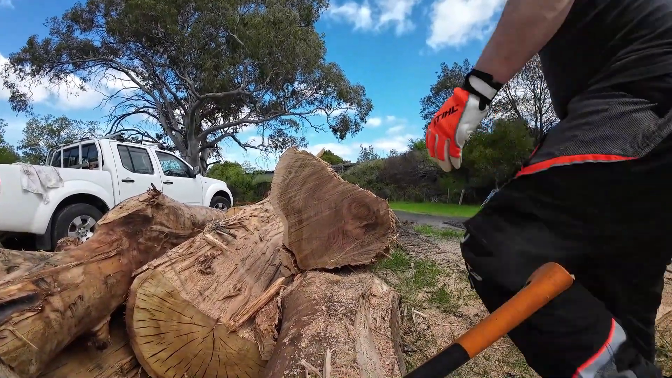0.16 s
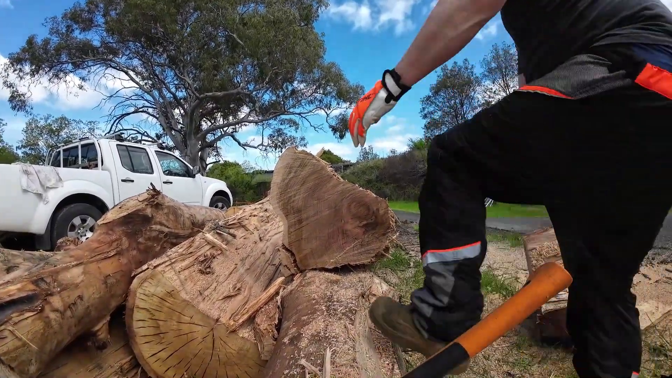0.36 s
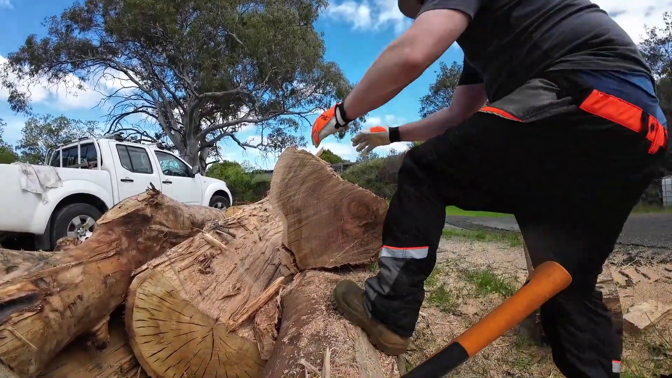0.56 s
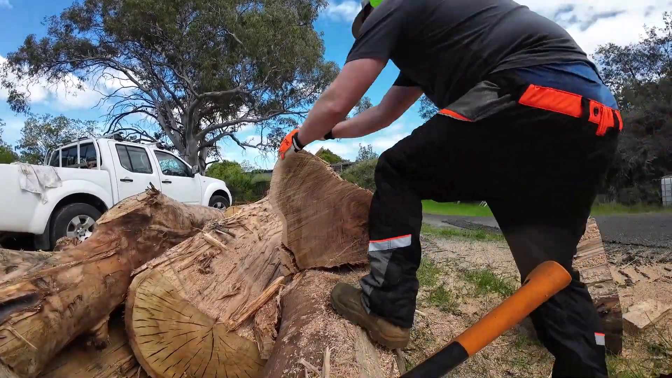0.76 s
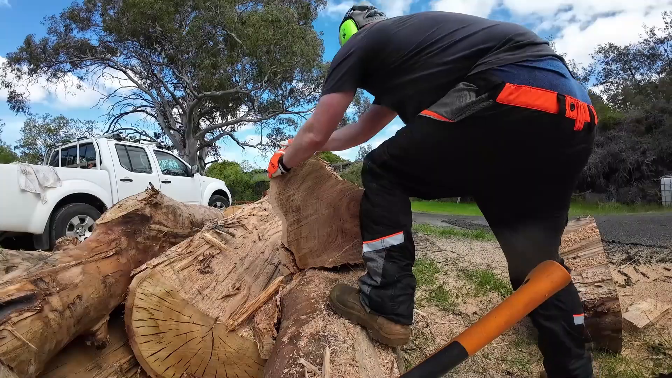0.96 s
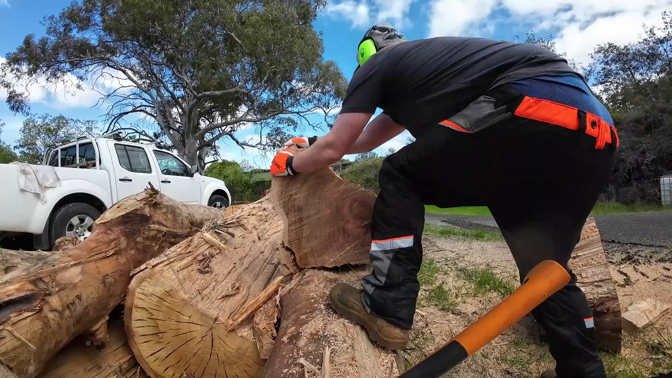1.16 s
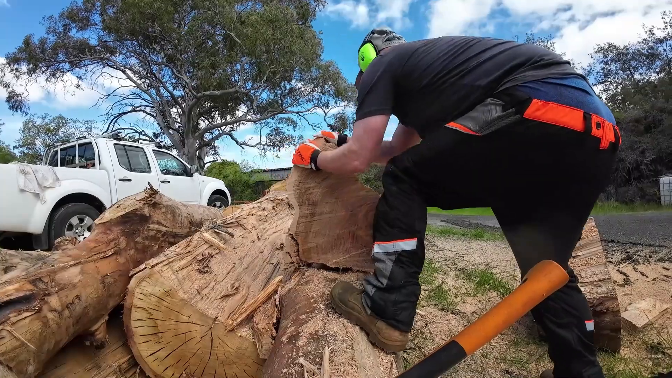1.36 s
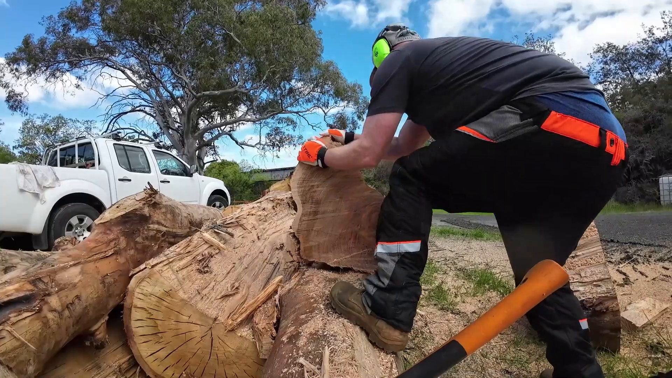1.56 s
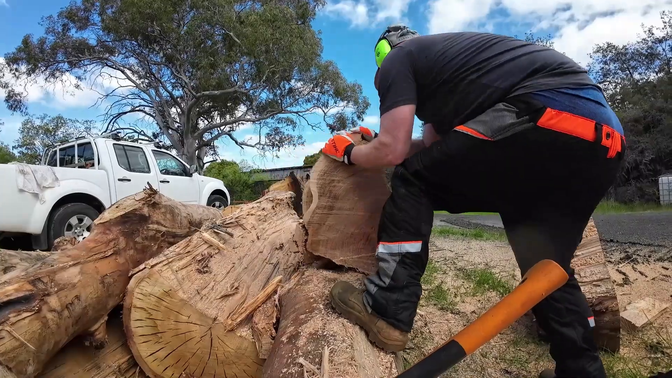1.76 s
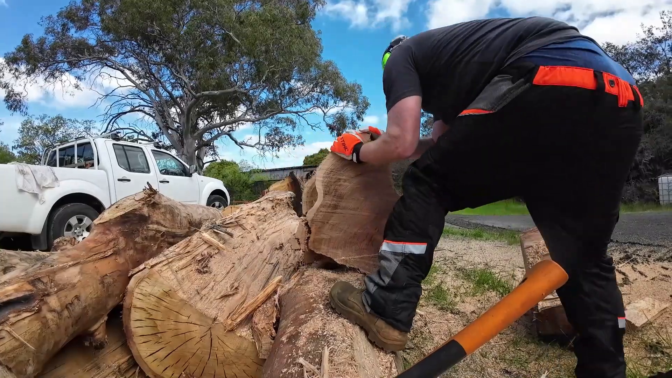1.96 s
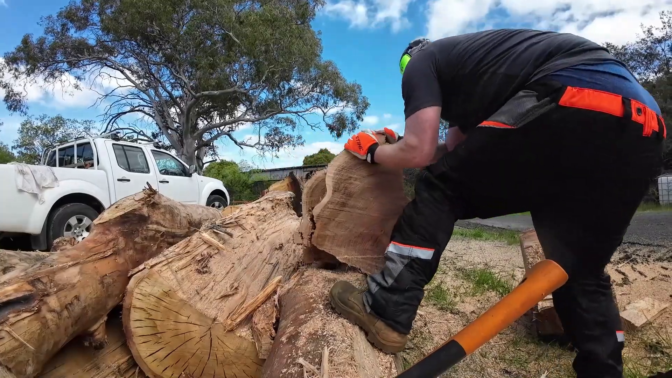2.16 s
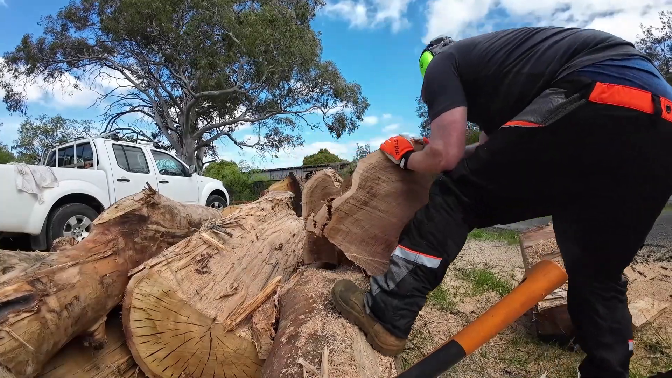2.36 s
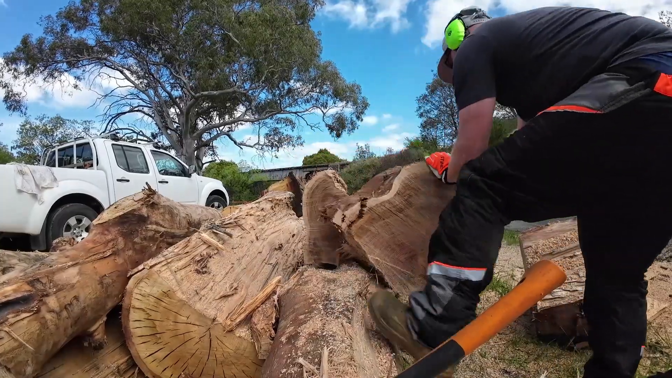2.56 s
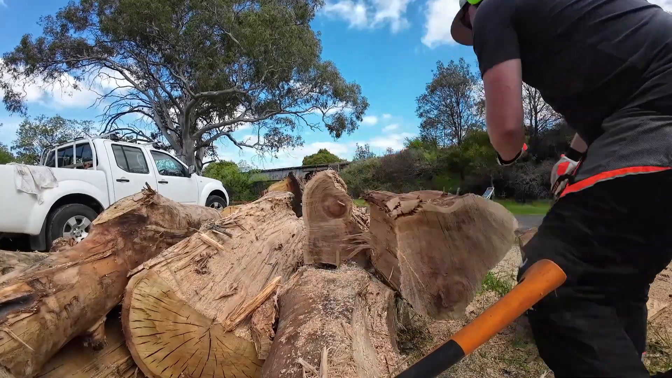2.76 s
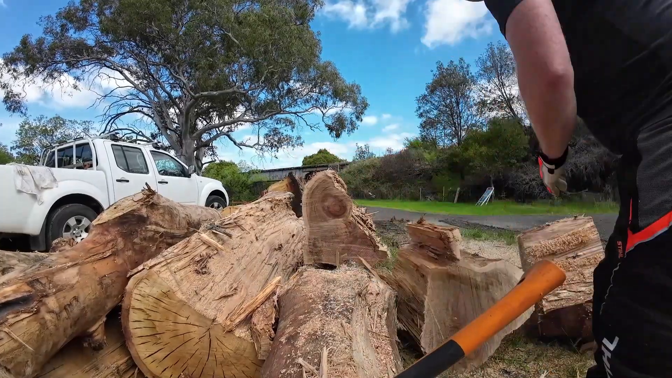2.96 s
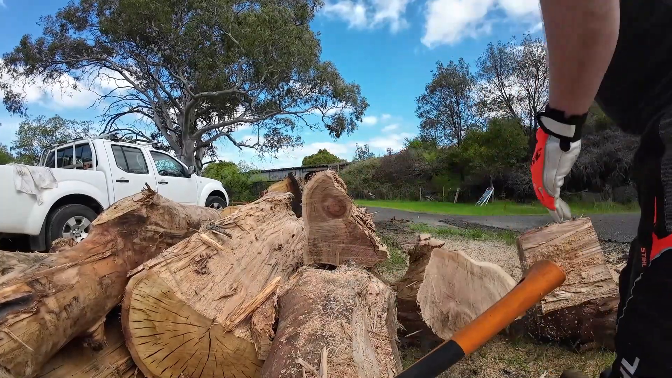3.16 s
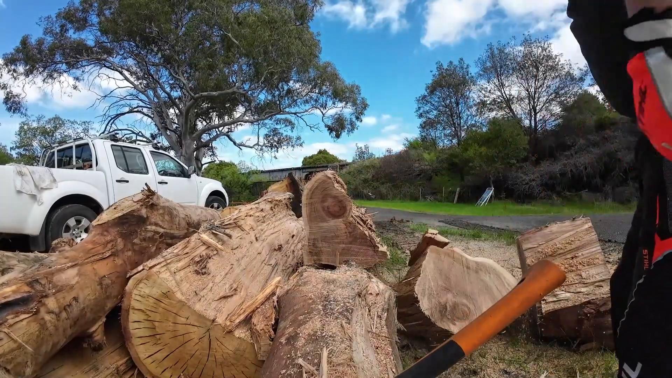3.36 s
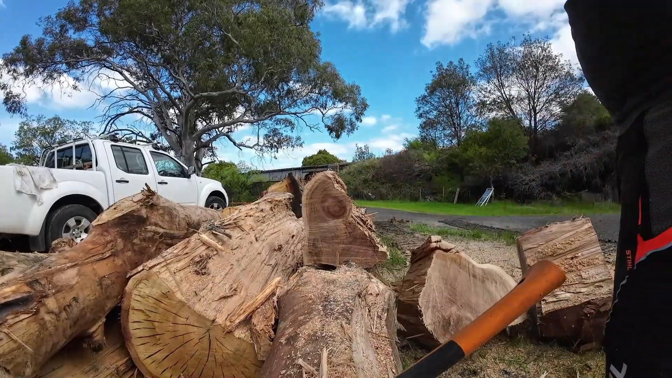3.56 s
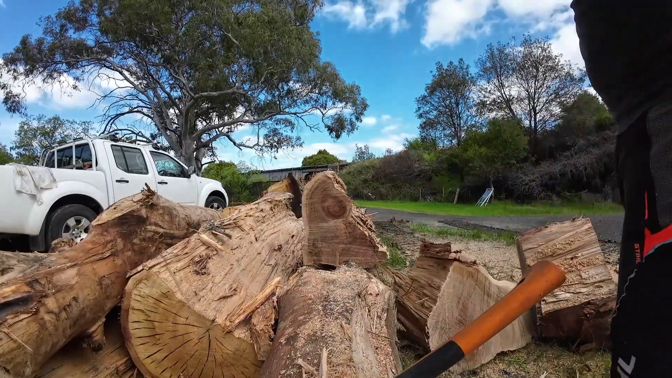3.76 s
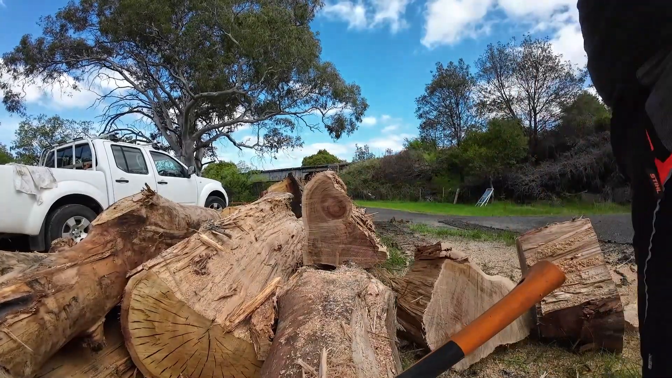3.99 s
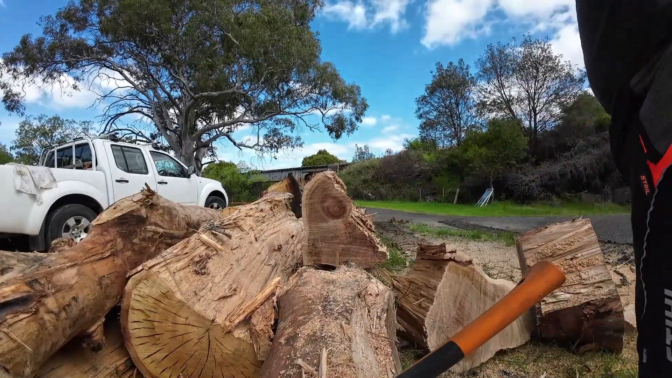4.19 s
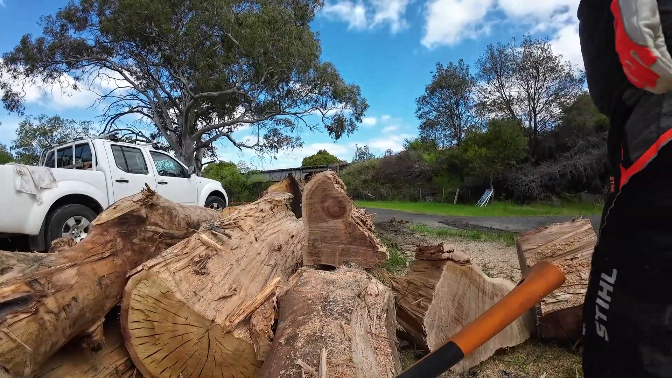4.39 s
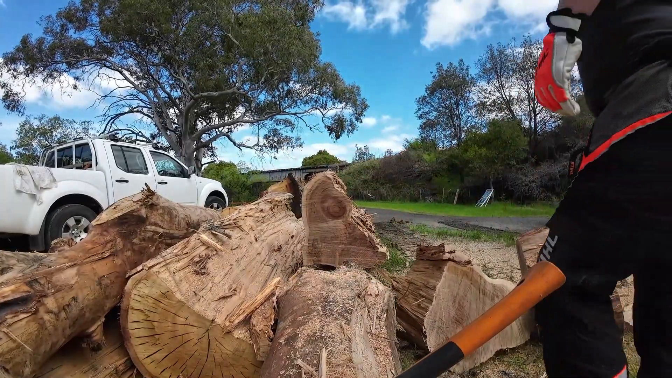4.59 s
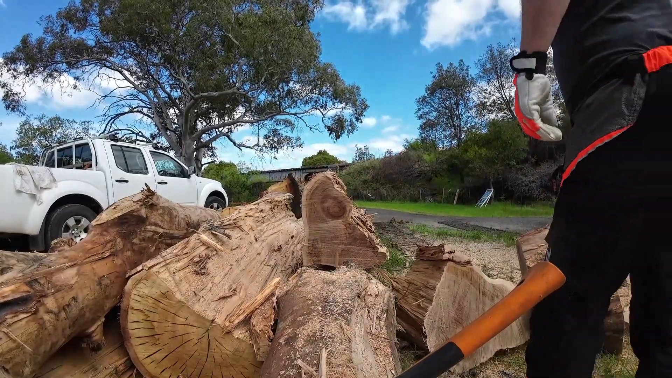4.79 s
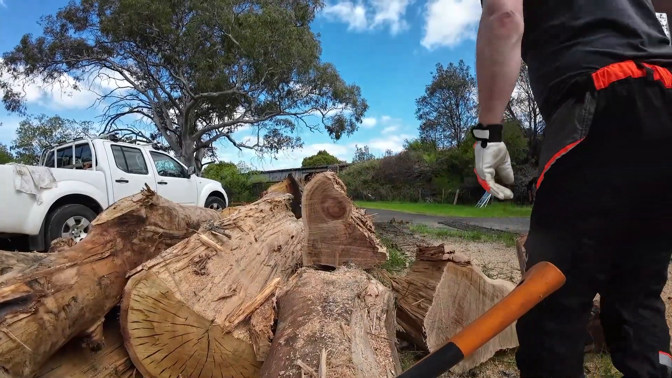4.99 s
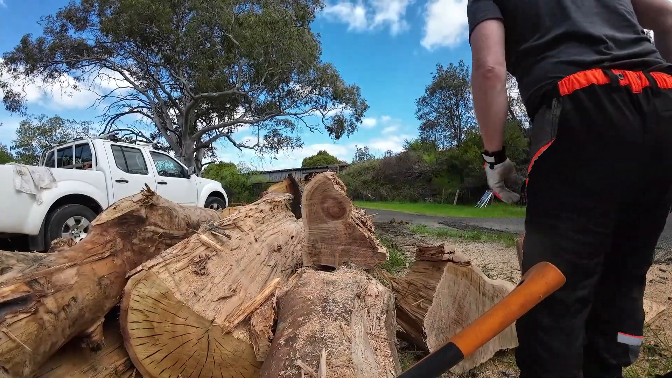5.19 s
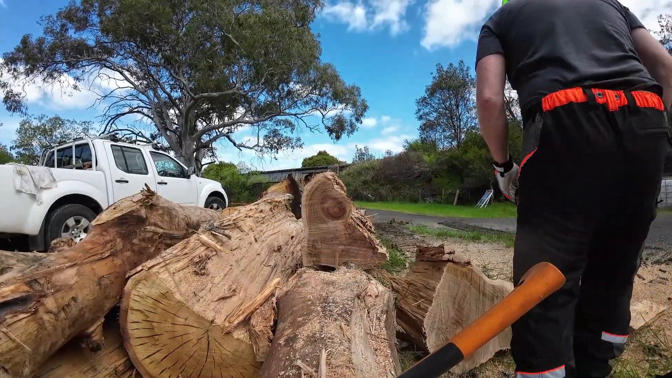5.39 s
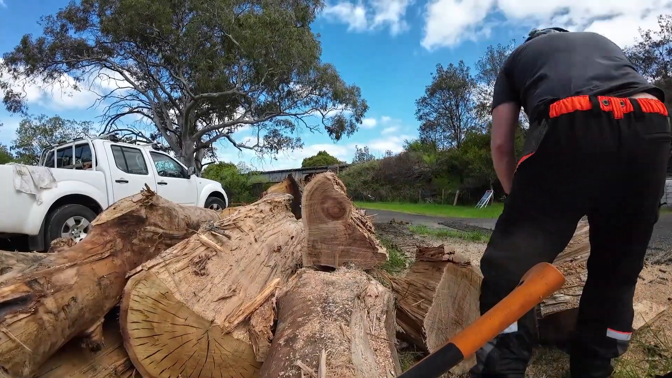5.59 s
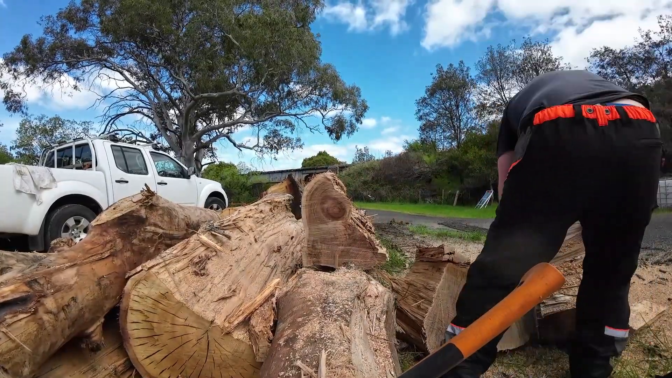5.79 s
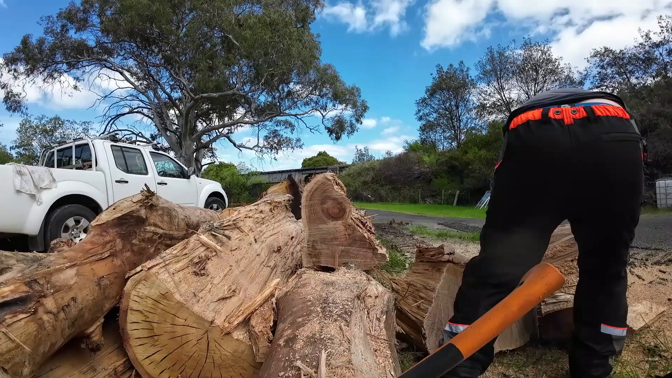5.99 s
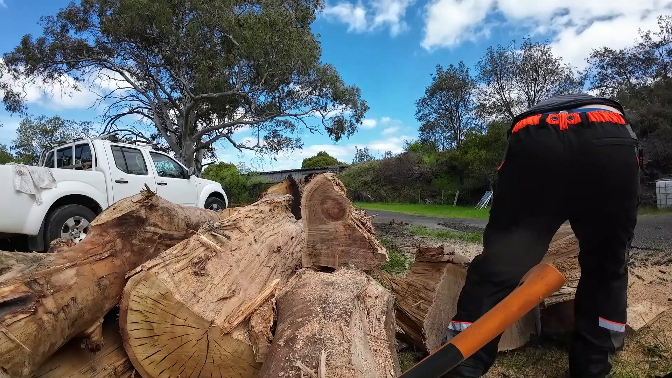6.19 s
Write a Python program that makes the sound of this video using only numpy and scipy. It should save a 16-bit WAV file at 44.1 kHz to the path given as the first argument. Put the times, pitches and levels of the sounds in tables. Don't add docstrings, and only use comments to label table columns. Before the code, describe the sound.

A heavy log round is wrenched loose outdoors with sharp cracking and rasping bark, then thuds to the soil as small birds whistle and trill.

```python
import sys
import numpy as np
from scipy import signal
from scipy.fft import rfft, irfft, next_fast_len
from scipy.io import wavfile
from scipy.ndimage import uniform_filter1d, map_coordinates

SR = 44100
rng = np.random.default_rng(int(sys.argv[2]) if len(sys.argv) > 2 else 0)


def volts_from_db(level):
    exponent = np.asarray(level, float) / 20
    return 10 ** exponent


def transcribe(u):
    v = np.clip(np.atleast_2d(u).T, -1, 1)
    q = np.round(v * 32767).astype(np.int16)
    wavfile.write(sys.argv[1], SR, q)


N = 275184

# start in seconds, peak in dB, ringing in Hz.
FIBRES = [(.669, -37, 1090), (1.2428, -29.5, 1640), (1.3186, -10, 3500), (1.3422, -0.5, 2320),
          (1.3574, -17, 2770), (1.369, -20, 3460), (1.3984, 1.5, 2930), (1.449, -8, 1720),
          (1.4656, -16, 3280), (1.5266, -11.5, 3100), (1.675, -6, 2970), (1.714, -27, 1380),
          (1.788, -14.5, 5700), (1.8387, -19, 2870), (1.8707, -17.5, 3500), (2.0364, -18.5, 1850),
          (2.158, -15, 1510), (2.2924, -25, 1600), (2.4532, -18.5, 1270), (2.7163, -11.5, 2000),
          (2.8684, -8, 1235), (3.1231, -16, 2690), (3.1564, -16, 1257), (3.385, -28.5, 1330),
          (3.8114, -30, 3200), (3.838, -24.5, 2340), (4.0841, -30.5, 1150)]
# start in seconds, peak in dB, ringing in Hz.
SPLINTERS = [(1.0899, -32.5, 1400), (1.295, -16.5, 1210), (1.4748, -9.5, 1120), (1.5184, -23, 1600),
             (1.5726, -26, 1030), (1.6683, -15.5, 5000), (1.7745, -17.5, 2120), (1.8067, -9, 2670),
             (1.8507, -14.5, 1740), (2.0014, -19.5, 5200), (2.0546, -22, 3300), (2.126, -27, 3300),
             (2.1775, -11.5, 1720), (2.2656, -2, 1788), (2.333, -16, 1700), (2.4349, -18, 1750),
             (2.517, -17, 4120), (2.5308, -14, 4940), (2.5655, -12, 6500), (2.7835, -19, 3480),
             (2.884, -7.5, 5030), (2.9268, -14.5, 3020), (3.081, -7.5, 5160), (3.0953, 4, 1930),
             (3.1786, -16.5, 1760), (3.2643, -40, 2580), (3.2983, -27, 1640), (3.641, -28, 1840),
             (3.8874, -18.5, 2320), (4.1768, -40, 1160)]
# start in seconds, peak in dB, ringing in Hz.
FLAKES = [(.873, -40, 1100), (1.6387, -23, 1880), (1.732, -17.5, 2650), (1.8278, -14, 1360),
          (1.9165, -22.5, 3290), (2.319, -17, 1670), (2.3989, -20.5, 5340), (2.4726, -7.5, 2030),
          (2.507, -17.5, 1910), (2.6745, -17, 1710), (2.765, -4.5, 5370), (3.2215, -14.5, 2180),
          (3.2456, -15, 5300), (3.706, -29.5, 5330), (3.91, -31, 1230), (3.9225, -26.5, 4750),
          (3.936, -39, 5000), (1.213, -42, 5500), (1.506, -34, 5500), (1.656, -35, 5000),
          (4.322, -44, 5780), (5.925, -51.5, 5915), (6.003, -48, 6000), (2.088, -31, 5500),
          (1.98, -42, 5500)]
# start in seconds, peak in dB, ringing in Hz.
CRUMBS = [(0.0378, -43, 5120), (0.5144, -59, 5870), (0.618, -38, 10200), (0.631, -40.5, 5250),
          (0.6404, -39, 5450), (0.6474, -45, 5300), (0.7284, -44, 5490), (1.0974, -45, 11300),
          (1.2874, -28, 7200), (1.4114, -19.5, 5690), (1.4404, -26, 5430), (1.4844, -35, 10200),
          (1.6244, -41, 11700), (1.6964, -41, 5360), (1.7424, -25, 7660), (1.812, -15, 5000),
          (1.8814, -41, 5770), (1.8904, -40, 5050), (1.9034, -32.5, 11200), (1.9435, -39, 6390),
          (1.989, -32, 5400), (2.164, -28, 7390), (2.1866, -16.5, 5330), (2.2134, -35.5, 5400),
          (2.285, -24, 11100), (2.3464, -38, 10100), (2.3594, -30.5, 9790), (2.3884, -29, 5290),
          (2.423, -37.5, 10100), (2.4454, -20.5, 7540), (2.4894, -34.5, 11200), (2.5414, -27, 11100),
          (2.5484, -21, 7440), (2.6964, -18, 5130), (2.7224, -26, 8490), (2.7404, -28, 8710),
          (2.7516, -11.5, 5800), (2.7754, -26, 5250), (2.9694, -32, 7290), (3.019, -24.5, 9440),
          (3.1064, -26, 5430), (3.1174, -30, 5240), (3.1344, -21, 11760), (3.141, -18, 11380),
          (3.1824, -20.5, 9810), (3.232, -14, 5440), (3.6114, -44, 5050), (3.6254, -43, 5000),
          (3.6314, -41, 5130), (3.6474, -43, 7880), (3.7114, -24, 6600), (3.7634, -46, 6000),
          (3.878, -36, 8530), (3.9314, -35, 5180), (3.9872, -53, 5890), (3.9954, -52, 9800),
          (4.062, -39, 5740), (4.1344, -51, 5300), (4.157, -48, 9890), (4.1714, -49, 8170)]
# start in seconds, peak in dB, ringing in Hz,
# fizz above 7 kHz in dB, length in ms.
TEARS = [(0.616, -43, 2060, -17, 48), (.638, -34.5, 3260, -16, 14), (1.306, -18, 3430, -21, 17),
         (1.364, -12.5, 1680, -34, 2.6), (1.3755, -7.5, 3470, -17.5, 4.3), (1.428, -8.5, 3340, -16, 6.2),
         (2.1986, -4.5, 1490, -13.5, 2.3), (2.578, -18, 1260, -14, 11), (2.627, -11.5, 1730, -8, 11),
         (2.7026, -7, 1270, -9, 6.7), (2.864, -9, 1186, -17, 8.8), (2.936, -1, 2500, -7.5, 11.7),
         (2.951, -4, 2480, -17, 4.8), (3.037, -8.5, 1768, -9, 28), (3.048, -7.5, 1873, -22.5, 13),
         (3.062, -3, 1970, -13, 15), (3.087, -12.5, 4570, -8.5, 5.8), (3.2065, -13, 1069, -25, 5),
         (3.35, -30.5, 2580, -11, 15), (3.565, -35.5, 1640, -16, 18), (4.867, -42.5, 3020, -18, 51),
         (1.004, -37, 1100, -19, 17), (2.2, -10.5, 1390, -40, 3), (3.044, -10.5, 900, -30, 10),
         (3.8, -39.5, 9600, -7, 79), (2.616, -26, 10600, 2, 8)]
# frequency in Hz, side minus middle in dB.
NEAR_SIDE = [(60, -24), (200, -22), (700, -17), (1300, -21), (2400, -16.5), (4400, -12), (8000, -8),
             (15000, -6)]


def snaps():
    snap_ms = .4
    breaks = [*TEARS]
    for rows, fizz_db in [(FIBRES, -22.5), (SPLINTERS, -9), (FLAKES, -6.5)]:
        breaks += [(*row, fizz_db, snap_ms) for row in rows]
    breaks += [(s, db - 3, ring_hz, -6.5, snap_ms, 4500) for s, db, ring_hz in CRUMBS]
    out = np.zeros((2, N + SR))
    for s, *how in breaks:
        out[:, round(s * SR) - 256:][:, :6144] += crack(*how)
    return spread(out[:, :N], NEAR_SIDE)


# frequency in Hz, level in dB per Hz.
WOOD = [(180, -60), (300, -6.5), (398, -15), (478, -10.5), (1040, -7.5), (1560, -3.5), (2030, -6.5),
        (3190, -5), (4160, -7), (5700, -5), (9090, -11), (10600, -7), (16000, -21)]


def crack(db, ring_hz, fizz_db, ms, thin_hz=1):
    t, hz = np.arange(-256, 5888) / SR, np.fft.rfftfreq(8192, 1 / SR)
    clumps_db = 4.8 * rng.standard_normal(len(t) // 24).repeat(24)
    splinters = rng.standard_normal((2, len(t))) * volts_from_db(clumps_db)
    splinters[:, 258] += rng.choice([-1, 1]) * (7 if ms < 1 else 5)

    swell = volts_from_db(-12) * np.exp(np.minimum(t, 0) / .0022) * (t < 0)
    late = np.maximum(t - ms / 1000, 0)
    tiring = volts_from_db(-9 * np.abs(np.minimum(t * 1000 / ms, 1) - .3))
    scatter = volts_from_db(-18 - 60 * late / .07)
    burst = splinters * (swell + (t >= 0) * (tiring * np.exp(-late / .002) + scatter))

    centres = np.append(ring_hz, 2600 * np.exp(0.792 * rng.standard_normal(3)))[:, None]
    weights, width_hz = np.array([[1.2], [.5], [.5], [.5]]), 450
    patches = weights * 1j * hz * width_hz / (centres ** 2 - hz ** 2 + 1j * hz * width_hz)
    ring = 1 + 1.83 * np.sum(patches, 0)
    colour = volts_from_db(along(WOOD, hz)) * ring / (1 + (thin_hz / (hz + 1)) ** 4)

    treble = 1 / (1 + (6500 / (hz + 1)) ** 6)
    brief = volts_from_db(fizz_db + 18) * (.4 + .6 * np.exp(-late / .002))
    both = rfft(burst, 8192) * (1 - treble) + rfft(burst * brief, 8192) * treble
    sound = irfft(both * colour)[:, :len(t)]
    return volts_from_db(db) * sound / np.abs(sound[0]).max()


# start in seconds, peak in dB, push in Hz,
# rumble in dB, time to fade by 60 dB in seconds.
LANDINGS = [
    (0.6322, -29, 220, -2, 0.072),
    (3.0455, -4, 141, -18, 0.45),
    (3.099, -27, 43.7, -4.5, 0.87),
    (3.208, -20.5, 800, 6.5, 0.035),
    (3.21, -24.5, 199, 4, 0.037),
]
# start in seconds, peak in dB, push in Hz,
# rumble in dB, time to fade by 60 dB in seconds.
KNOCKS = [(1.326, -56, 77, -24, 0.099), (1.5153, -12.5, 169, -7, 0.3), (2.364, -36, 305, 3.5, 0.096),
          (2.8, -31, 292, 0, 0.051), (2.786, -41, 160, 14, 0.078), (2.434, -36.5, 402, -1, .05),
          (2.63, -26, 430, 0, 0.065), (2.905, -34, 90, -6, 0.055), (2.946, -29.5, 305, -13, .06),
          (2.98, -32, 200, 3, .05), (3.095, -21.5, 400, -1, .05), (1.92, -44, 300, 0, .08),
          (3.143, -26, 296, -3, 0.046), (3.3, -34, 253, 4, 0.11), (3.316, -30.5, 35.2, -5, 0.42),
          (3.7806, -37.5, 490, -4, 0.092), (3.791, -29, 446, -13, 0.26), (3.8114, -38, 495, -16, 0.046),
          (4.9, -57, 253, 15, 0.15), (5.075, -43, 300, 3.5, 0.049)]


def thuds():
    lead = SR // 20
    out, t = np.zeros(N + SR), np.arange(-lead, SR // 2) / SR
    after = np.maximum(t, 0)
    blows = [(*row, .62) for row in LANDINGS] + [(*row, .082) for row in KNOCKS]
    for s, db, push_hz, rumble_db, t60, suction in blows:
        swing = np.cos(2 * np.pi * push_hz * t) * np.exp(-(push_hz * t / 0.51) ** 4)
        pull = np.where(t < 0, 1.5 * suction, 3.2 * (1 - suction))
        push = swing * np.where(swing > 0, 1, pull)
        push = filtered(push, lambda hz: 1 / (1 + (hz / push_hz / 2.2) ** 6))

        body = [(push_hz / 4, -25), (push_hz * .6, 0), (push_hz * 1.4, -5),
                (push_hz * 2.3, -25), (push_hz * 20, -75)]
        rumble = coloured(rng.standard_normal(len(t)), body)
        deep = filtered(rumble, lambda hz: 1 / (1 + (hz / push_hz / .8) ** 4))
        fading_db = -60 * after / t60
        rumble = deep * volts_from_db(fading_db) + (rumble - deep) * volts_from_db(2.2 * fading_db)
        rumble *= volts_from_db(rumble_db) * (1 - np.exp(-after / 0.004))
        out[round(s * SR) - lead:][:len(t)] += volts_from_db(db) * (push + rumble)
    return out[:N]


# time in seconds, drag in dB.
RUB = [(0, -65), (1.24, -64.5), (1.33, -36.5), (1.45, -42.5), (1.58, -59), (1.7, -38), (1.9, -41.5),
       (2.1, -66), (2.3, -40.5), (2.55, -38.5), (3.12, -36), (3.3, -41), (3.45, -54.5), (3.85, -53.5),
       (4.1, -53.5), (4.3, -66.5), (4.8, -81.5), (6.24, -81)]
# time in seconds, drag in dB.
RUSTLES = [(.38, -63), (.73, -72.5), (.97, -63), (1.11, -60), (3.58, -63), (4.93, -70.5), (5.08, -64),
           (5.4, -68.5), (5.69, -62.5), (5.82, -56), (6.23, -63.5)]
# frequency in Hz, level in dB per Hz.
RASP = [(290, -32.5), (500, 0), (1080, 1), (1340, 2.5), (1510, -3), (1640, 0.5), (1790, -0.5), (3650, -2),
        (3980, -7), (5630, 0), (9090, -3), (11600, -2.5), (16000, -13)]


def rubbing():
    drag_db = np.interp(np.arange(N) / SR, *np.transpose(RUB))
    cloth = humps(RUSTLES, db_per_s=81)
    rasp_db = 20 * np.log10(volts_from_db(drag_db) + cloth)
    harshness = np.clip((rasp_db + 78.0) / 25, .1, 1.2)

    ticks = (rng.random(N) < 500 / SR) * volts_from_db(3.5 * rng.exponential(size=N).clip(0, 3))
    ticks = np.sqrt(signal.fftconvolve(ticks ** 2, np.exp(-np.arange(300) / 50))[:N].clip(0))

    z = signal.stft(rng.standard_normal((2, N)), nperseg=256)[2]
    patches = uniform_filter1d(rng.standard_normal(z.shape[1:]), size=5, axis=0)
    patches = uniform_filter1d(patches, size=4, axis=1)
    drag = signal.istft(z * volts_from_db(3.2 * unit(patches)), nperseg=256)[1][:, :N]

    grit = drag * (1 + harshness * unit(ticks)) / (1 + harshness)
    grit = grit * volts_from_db(2.5 * harshness * wobble(25))
    grit = filtered(grit, lambda hz: volts_from_db(along(RASP, hz)))
    fizz = filtered(grit, lambda hz: 1 / (1 + (5500 / (hz + 1)) ** 8))
    fizz_gain = volts_from_db(drag_db - 11) + volts_from_db(-6) * cloth
    return spread(volts_from_db(rasp_db - 3.5) * unit(grit - fizz) + fizz_gain * unit(fizz), NEAR_SIDE)


# time in seconds, groan in dB, ground shake in dB.
LURCHES = [
    (1.57, -27, -21.5),
    (1.77, -37.5, -28.5),
    (1.92, -41.5, -29),
    (2.442, -30.5, -29),
    (2.52, -29, -22.5),
    (2.63, -21.5, -12),
    (2.74, -39, -27),
    (2.93, -34, -36),
]
# time in seconds, thump in dB, shake in dB.
JOLTS = [
    (.67, -41.5, -36),
    (1.33, -37.5, -32),
    (3.09, -40, -32),
    (3.37, -47, -37),
    (3.95, -45, -50),
    (4.15, -47, -46.5),
    (5.07, -51.5, -55),
    (6.08, -44, -48.5),
]
# frequency in Hz, level in dB per Hz.
GROAN = [(18, -26.5), (30, -3), (92, -1), (177, -20.5), (214, -19.5), (381, -30.5), (450, -28),
         (500, -29.5), (650, -57), (1100, -120)]


def rocking():
    moves = [(s, db) for s, db, _ in [*LURCHES, *JOLTS]]
    return humps(moves, db_per_s=130.5, sudden=1.6) * swaying(GROAN)


# start in seconds, level in dB, note gap in seconds,
# slowing in seconds per note squared.
TRILLS = [
    (.5985, -52, .0535, -.0004),
    (2.078, -49, .047, 0),
    (4.276, -46.5, .0432, .0007),
]
# seconds after its start, pitch in Hz, level in dB.
HOOK = [
    (0, 6900, -12),
    (.008, 7800, -2),
    (.03, 7850, -5),
    (.045, 7600, -1),
    (.053, 7450, -6),
    (.056, 6000, -2),
    (.061, 4700, -6),
    (.066, 4500, -14),
]
# start in seconds, level in dB.
HOOKS = [
    (0.163, -48.5),
    (3.648, -48.5),
]
# start in seconds, length in seconds, from in Hz, to in Hz, level in dB.
SLURS = [(.13, .008, 6000, 4800, -60), (.138, .013, 4800, 4350, -59), (.136, .016, 9900, 8600, -68),
         (4.622, .04, 3330, 3350, -66), (4.42, .035, 4600, 4620, -68), (1.73, .04, 8100, 7450, -53),
         (3.61, .03, 5300, 4200, -60), (4.175, .025, 2990, 2700, -64), (4.5, .045, 3600, 4050, -70),
         (4.89, .04, 3400, 3900, -66), (5.34, .06, 5170, 5040, -69), (6.06, .04, 2860, 4100, -68),
         (5.4, .035, 3600, 3800, -68), (6.16, .06, 5240, 5220, -73)]
# start in seconds, length in seconds, top in Hz, level in dB.
ARCHES = [
    (3.478, .032, 3830, -57),
    (4.425, .035, 4150, -68),
    (4.805, .055, 4280, -69),
]
# time in seconds, pitch in Hz, level in dB.
HELD = [
    [(5.49, 5606, -89), (5.504, 5595, -68), (5.53, 5526, -63), (5.566, 5567, -75), (5.614, 5501, -75),
     (5.662, 5561, -61), (5.722, 5518, -73), (5.742, 5548, -64), (5.8, 5486, -79)],
    [(5.8, 5496, -74), (5.828, 5559, -79), (5.888, 5526, -63), (5.906, 5487, -77), (5.974, 5558, -67),
     (6.004, 5533, -79), (6.048, 5583, -64), (6.056, 5618, -71), (6.15, 5526, -84)],
]


def birds():
    calls = [[(s + after, hz, db + rel_db) for after, hz, rel_db in HOOK] for s, db in HOOKS]
    calls += [[(s, hz, db - 2.5) for s, hz, db in note] for note in HELD]

    glides = [(s, span, a, (a + b) / 2, b, db) for s, span, a, b, db in SLURS]
    glides += [(s, span, .86 * hz, hz, .86 * hz, db) for s, span, hz, db in ARCHES]
    for s, span, a, mid, b, db in glides:
        calls.append([(s, a, db - 7), (s + span / 2, mid, db), (s + span, b, db - 7)])

    for start, db, gap, slowing in TRILLS:
        for k in range(8):
            s = start + gap * k + slowing * k * k - .007 * (k == 0)
            at_end = k in (0, 7)
            level = db - 6.5 * at_end + rng.normal(0, 0.13)
            bend = 1 + rng.normal(0, 0.0075) - .03 * at_end
            calls.append([(s - .012, 3600 * bend, level - 24), (s - .005, 3600 * bend, level - 4),
                          (s + .002, 3340 * bend, level), (s + .006, 3150 * bend, level - 14),
                          (s + .014, 2800 * bend, level - 27)])

    quaver = wobble(160), wobble(45)
    song = sum(whistle(rows, quaver) for rows in calls)
    t = np.arange(SR // 3) / SR
    trees = rng.standard_normal((2, len(t))) * volts_from_db(-60 * t / .3)
    echo = signal.fftconvolve(song[None], trees / np.linalg.norm(trees[0]), axes=1)[:, :N]
    ground_echo = volts_from_db(-8) * np.roll(song, round(.0065 * SR))
    return song + ground_echo + volts_from_db(-8) * echo


def whistle(rows, quaver):
    s, hz, db = np.transpose(rows)
    on, out = np.arange(round(s[0] * SR), round(s[-1] * SR)), np.zeros(N)
    pitch_hz = np.interp(on / SR, s, hz) * (1 + .006 * quaver[0][on])
    level_db = np.interp(on / SR, s, db) + 1.6 * quaver[1][on]
    out[on] = np.sqrt(2) * volts_from_db(level_db) * np.sin(2 * np.pi * np.cumsum(pitch_hz) / SR)
    return out


# frequency in Hz, level in dB per Hz.
AIR = [(15, -35.5), (25, 1.5), (58, 0.5), (87, -8.5), (149, -9.5), (190, -13.5), (236, -14.5), (270, -13.5),
       (317, -17.5), (503, -16), (2690, -31.5), (3340, -34), (4370, -38), (8600, -50), (10600, -48),
       (13500, -60), (16000, -59)]
# time in seconds, pitch in Hz, level in dB.
ENGINE = [
    (0, 134.8, -63),
    (1.5, 140, -64.5),
    (3.4, 141.7, -65.5),
    (3.8, 146.2, -58.5),
    (4.7, 147.2, -59.5),
    (5.4, 149.8, -56.5),
    (6.24, 146.3, -59),
]
# frequency in Hz, side minus middle in dB.
FAR_SIDE = [(60, -24.5), (200, -30), (700, -28.5), (1300, -23.5), (2400, -18), (4400, -12.5), (8000, -4.5),
            (15000, 2.5)]


def air():
    hum = coloured(rng.standard_normal((2, N)), AIR) * volts_from_db(-49 + .7 * wobble(1.7) + .4 * wobble(3))
    drone = whistle(ENGINE, (wobble(6), wobble(4.6)))
    return spread(hum, FAR_SIDE, echoed=.15, extra_db=10.0) + drone


# frequency in Hz, level in dB per Hz.
SHAKE = [(10, -31.5), (20, -1.5), (48, 5.5), (70, -13), (100, -16.5), (140, -32.5), (240, -35),
         (440, -68.5)]


def buffet():
    jolts = humps([(s, db) for s, _, db in [*LURCHES, *JOLTS]], db_per_s=141.5)
    breeze = volts_from_db(-60 + 3 * wobble(2.5))
    shake = (jolts + breeze) * swaying(SHAKE)
    return np.array([1.06 * shake, -.94 * shake])


def swaying(spectrum):
    noise = coloured(rng.standard_normal(N), spectrum)
    return unit(noise / np.sqrt(np.abs(uniform_filter1d(noise ** 2, size=1300)) + .05))


def humps(rows, db_per_s, sudden=1):
    s, db = np.transpose(rows)[..., None]
    late = np.arange(N) / SR - s
    away = np.maximum(late, -sudden * late)
    return np.sqrt(np.sum(volts_from_db(db - db_per_s * away) ** 2, axis=0))


def spread(pair, side, echoed=.45, extra_db=0):
    def gain(hz):
        return volts_from_db(along(side, hz) + extra_db)
    lag = filtered(pair[0], lambda hz: -1j * np.sqrt(echoed) * gain(hz))
    width = lag + filtered(pair[1], lambda hz: np.sqrt(1 - echoed) * gain(hz))
    return np.array([pair[0] + width, pair[0] - width])


def wobble(rate):
    knots = rng.standard_normal(int(N * rate / SR) + 4)
    return map_coordinates(knots, [np.arange(N) * rate / SR])


def coloured(x, spectrum):
    return unit(filtered(x, lambda hz: volts_from_db(along(spectrum, hz))))


def filtered(x, response):
    m = next_fast_len(x.shape[-1] + 8192)
    return irfft(rfft(x, m) * response(np.fft.rfftfreq(m, 1 / SR)), m)[..., :x.shape[-1]]


def along(points, hz):
    f, v = np.transpose(points)
    return np.interp(np.log(hz + 1), np.log(f + 1), v)


def unit(x):
    return x / np.sqrt(np.mean(x ** 2) + 1e-20)


def scene():
    blows = thuds() + rocking()
    jolt = volts_from_db(-21.5) * np.roll(blows, SR // 300)
    wood = snaps() + rubbing() + blows + [jolt, -jolt]
    return wood * volts_from_db([[.3], [-.3]]) + birds() + air() + buffet()


def roll_off(x):
    return signal.sosfilt(signal.butter(12, 16970, fs=SR, output="sos"), x)


def record(dry):
    soft = dry / (1 + np.abs(dry / .8) ** 4) ** (1 / 4)
    band = filtered(soft, lambda hz: np.maximum(1 / (1 + (hz / 15900) ** 400), volts_from_db(-26) * (hz < 16900)))
    return roll_off(band)


dry = scene()
out = record(dry)
transcribe(out)
```